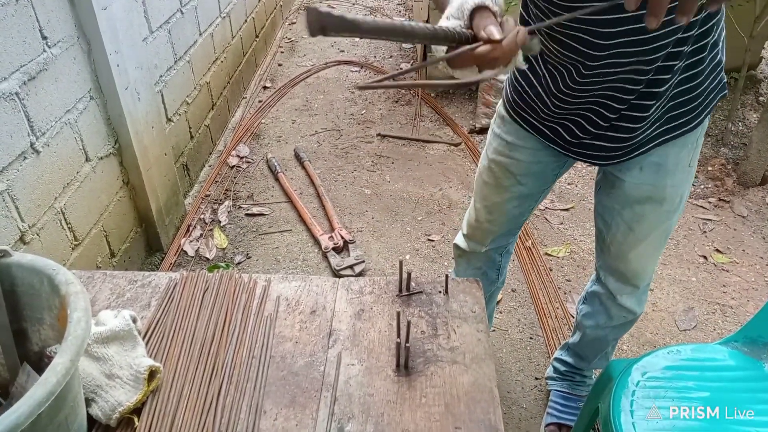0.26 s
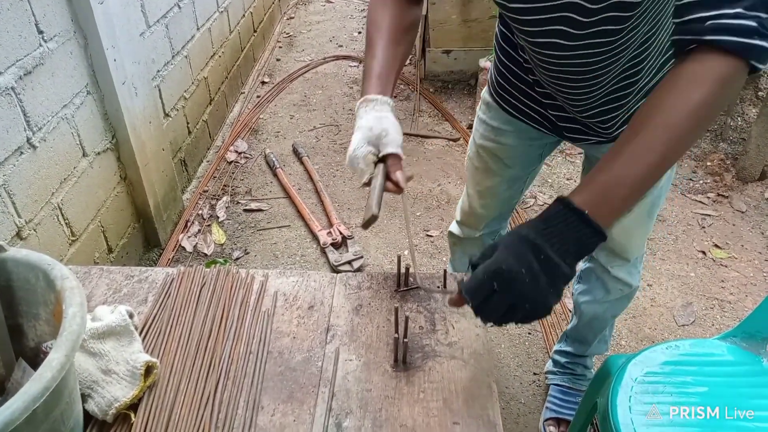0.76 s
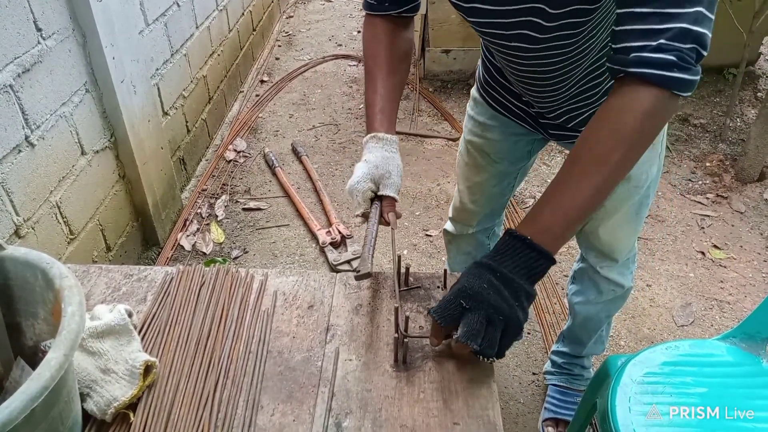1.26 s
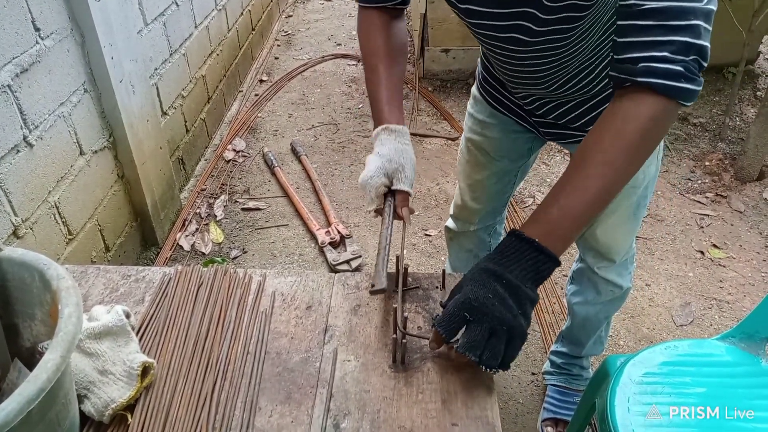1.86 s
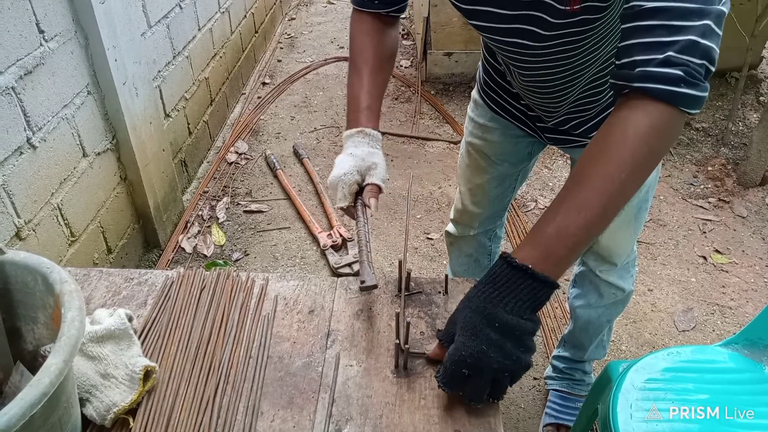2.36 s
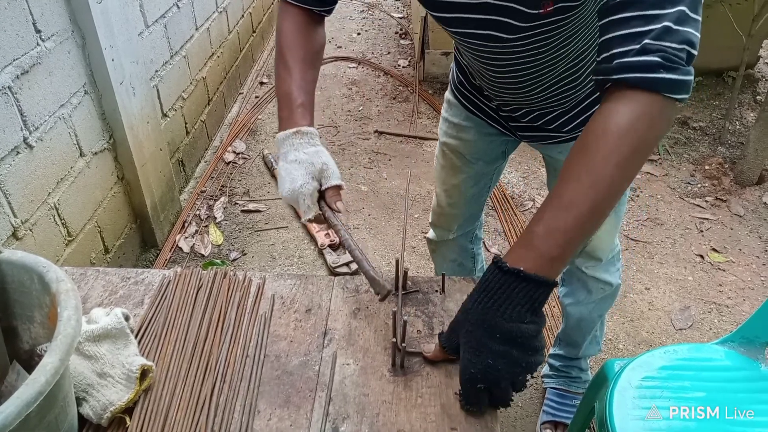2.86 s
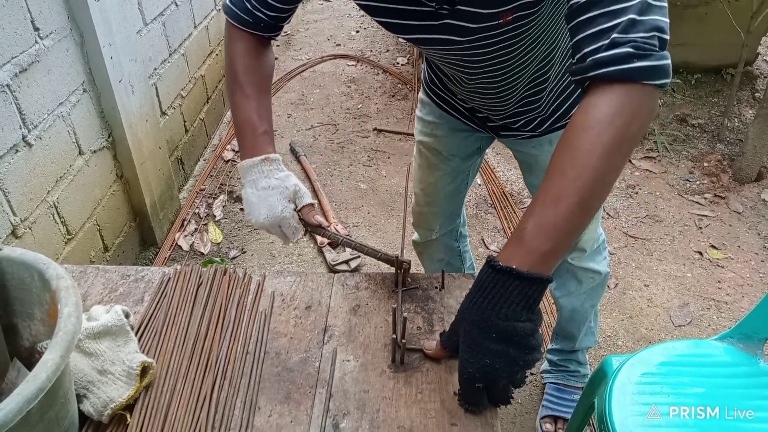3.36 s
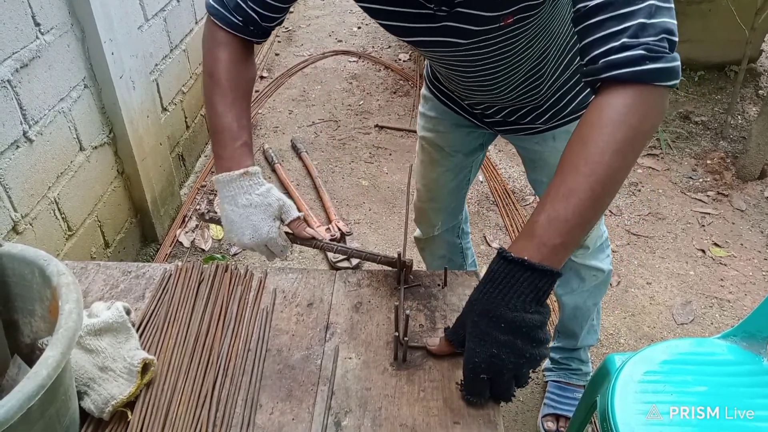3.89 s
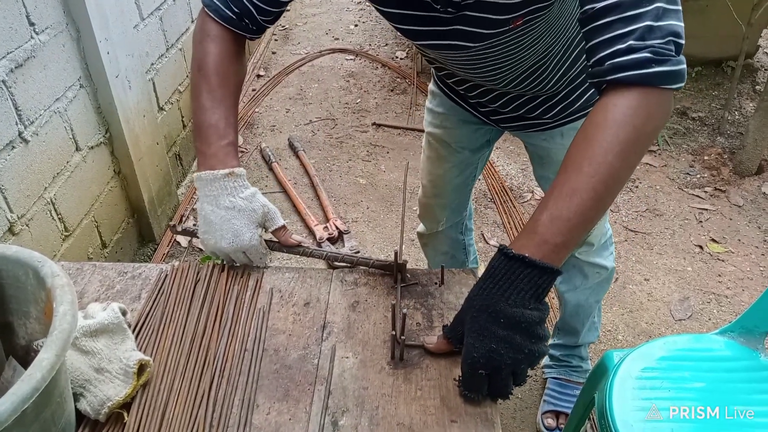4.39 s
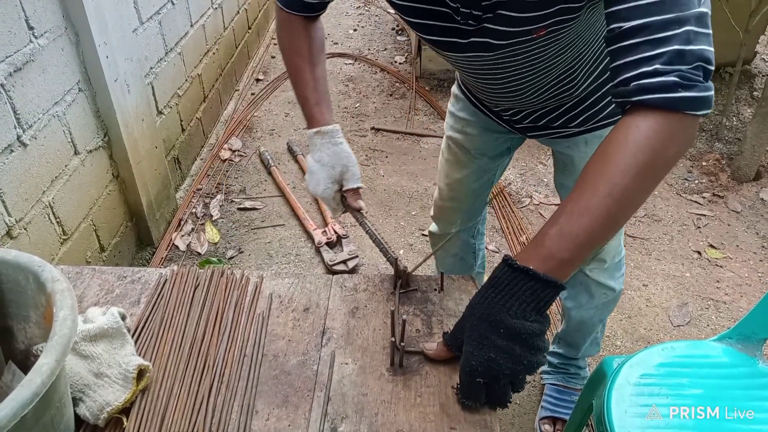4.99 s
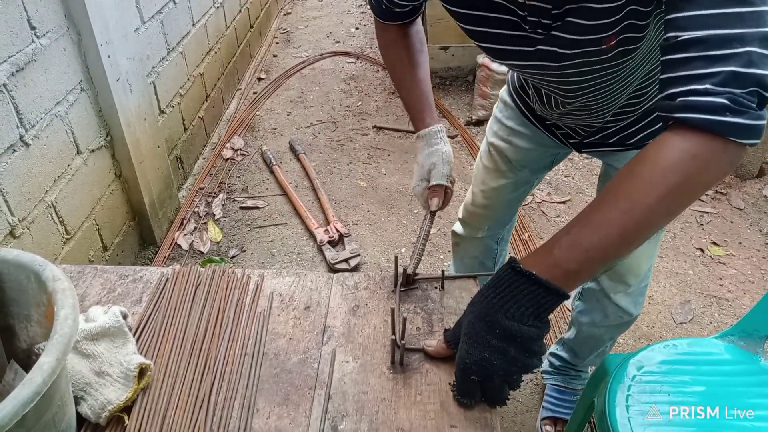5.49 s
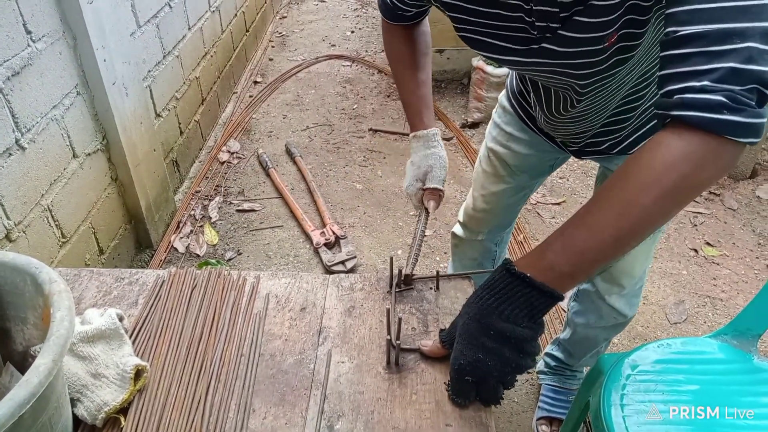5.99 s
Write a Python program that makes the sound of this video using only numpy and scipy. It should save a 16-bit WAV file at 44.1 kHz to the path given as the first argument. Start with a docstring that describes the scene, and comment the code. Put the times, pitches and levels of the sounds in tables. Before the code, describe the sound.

Sporadic bright metal clinks and dull wooden knocks from bending a bar by hand, over pulsing cicada hiss and a faint outdoor rumble.

```python
"""On an outdoor wooden workbench, a thin steel bar is laid between steel pins and bent with a hand lever.
Bar and lever clink, slide and rattle: noise bursts and fading tones make the steel, the jig and the bench.
Behind, a cicada hisses in swelling phrases of shaped noise with a thin whistle, and a bush cricket chirps
very high. Steady noise makes an insect chorus and a low rumble; a wavering tone makes a faint far hum."""
import sys
import numpy as np
from scipy import signal
from scipy.fft import rfft, irfft, next_fast_len
from scipy.io import wavfile
from scipy.ndimage import uniform_filter1d, minimum_filter1d, map_coordinates

SR = 44100
rng = np.random.default_rng(int(sys.argv[2]) if len(sys.argv) > 2 else 0)


def to_wav(s):
    """Save 16-bit WAV."""
    ch = np.atleast_2d(s).T  # columns
    pcm = np.round(np.clip(ch, -1, 1) * 32767)  # PCM
    wavfile.write(sys.argv[1], SR, pcm.astype(np.int16))


N = 275184
TIME = np.arange(N) / SR

# Tone colours of crowded short resonances: the bright clink of the steel and the middle clack of the jig. Each
# row: frequency in Hz, relative level per Hz in dB.
CLINK_COLOUR = [(1500, -53), (2000, -5.5), (2600, 1), (3400, 7.5), (4200, -2), (4900, -22), (7200, -39),
                (8200, -62.5), (15500, -58)]
CLACK_COLOUR = [(480, -76), (620, -21), (740, 7.5), (950, 1), (1200, -4), (1350, -3), (1530, -7), (1750, 9),
                (2200, -1), (3000, -10), (5000, -59.5)]
# The bite of a hard blow. Each row: frequency in Hz, relative level per Hz in dB.
BITE_COLOUR = [(3500, -18.5), (4400, -7), (5200, 13), (6000, -1), (7200, 0), (8200, -4.5), (12000, -4.5),
               (15500, -30.5)]
# Ringing tones (modes) of the jig and its steel pins, and of the bench top.
# Each row: frequency in Hz, relative level in dB, time to fade by 60 dB in seconds.
JIG_MODES = [(711, -1, 0.091), (787.3, -2, 0.12), (855, 6.5, 0.038), (971, 0.5, 0.063), (1042, -3, 0.033),
             (1138, -6.5, 0.11), (1340, 2, 0.061), (1473, -12, 0.15), (1565, -6.5, 0.087), (1772, 2, 0.06),
             (1987, -6, 0.077), (2260, -4.5, 0.18)]
BENCH_MODES = [(148.4, -6.5, 0.068), (206, -11.5, 0.051), (276.4, -4.5, 0.07), (334.5, 2, 0.11),
               (415.4, -5, 0.086), (468.3, -6, 0.11)]


def amp(db):
    """Turn decibels into a gain."""
    return 10 ** (np.asarray(db) / 20)


def unit(x):
    """Scale a sound to an average (rms) level of 1."""
    return x / np.sqrt(np.mean(x ** 2) + 1e-20)


def wobble(rate):
    """Draw a smooth random curve through `rate` random points a second."""
    return map_coordinates(rng.standard_normal(N // 8), [TIME * rate], mode="mirror")


def filtered(x, response):
    """Multiply each frequency in x by the gain that response(Hz) gives."""
    size = next_fast_len(N + 8192)
    hz = np.fft.rfftfreq(size, 1 / SR)
    return irfft(rfft(x, size) * response(hz), size)[:N]


def coloured(x, spectrum):
    """Shape x by a table of (Hz, dB) points and scale it to rms 1."""
    point_hz, point_db = np.transpose(spectrum)
    # the curve runs straight between points on a logarithmic frequency scale
    return unit(filtered(x, lambda hz: amp(np.interp(np.log(hz + 1), np.log(point_hz), point_db))))


def noise(spectrum):
    """Make hiss shaped by a (Hz, dB) table, at rms 1."""
    return coloured(rng.standard_normal(N), spectrum)


def narrow(hz, width_hz):
    """Make a tone blurred by random wobbling, like a noisily driven resonance following a pitch curve."""
    phase = 2 * np.pi * np.cumsum(hz * np.ones(N)) / SR
    return unit(wobble(width_hz) * np.cos(phase) + wobble(width_hz) * np.sin(phase))


def gesture(start, length, attack, release, swell_db=0):
    """Rise over attack, hold while swelling by swell_db a second, then fall 20 dB per release time."""
    t = TIME - start
    held_db = swell_db * (np.clip(t, 0, length) - length / 2)
    fall_db = 20 * np.maximum(t - length, 0) / release
    return np.clip(t / attack, 0, 1) * amp(held_db - fall_db)


def add(track, s, sound):
    """Mix a sound into the track at s seconds."""
    part = track[round(s * SR):][:len(sound)]
    part += sound[:len(part)]


def fade(t, t60, attack):
    """Rise quickly, then die away by 60 dB every t60 seconds."""
    return amp(-60 * t / t60) * (1 - np.exp(-t / attack))


def struck(modes, t, scatter_db, detune):
    """Ring a set of fading tones; the grip shifts their strengths and pitches at every blow."""
    hz, db, t60 = np.transpose(modes)[:, :, None]
    gain = amp(db + scatter_db * rng.standard_normal(hz.shape))
    hz = hz * (1 + detune * rng.standard_normal(hz.shape))
    waves = np.sin(2 * np.pi * (hz * t + rng.random(hz.shape))) * amp(-60 * t / t60)
    # scaled so that the set starts at rms 1, apart from its soft onset
    ringing = (gain * waves).sum(0) / np.sqrt(np.sum(gain ** 2) / 2)
    onset = (1 - np.exp(-t / 0.00036)) ** 2
    return ringing * onset


def yard(x, t60):
    """Add up scattered echoes from the wall and the ground, modelled as a burst of fading noise."""
    t = np.arange(SR // 2) / SR
    tail = rng.standard_normal(len(t)) * fade(t, t60, attack=0.0054)
    return signal.fftconvolve(x, tail / np.linalg.norm(tail))[:N]


def cicada():
    """Rasping phrases with a thin, grainy whistle that flares early, sags, and drops away as each runs out."""
    # Cicada phrases. Each row: start in seconds, length in seconds, low rasp level in relative dB,
    # high rasp level in relative dB, swell in dB per second, whistle length in seconds,
    # whistle starting pitch in Hz, whistle level in relative dB.
    phrases = [(-.1, 0.25, -45.5, -40, -5, 0.34, 5660, -61),
               (0.333, 0.73, -50, -43.5, 7, 0.65, 5690, -54.5),
               (1.215, 0.48, -50, -40.5, 6.5, .52, 5660, -55),
               (1.87, 0.56, -45, -45.5, -2, 0.3, 5577, -57.5),
               (2.738, 0.47, -51.5, -48, 15, 0.244, 5879, -61.5),
               (3.502, 0.4, -44, -47, 5, 0.47, 5940, -67),
               (4.398, 0.44, -41, -41.5, -8.5, 0.52, 5953, -54.5),
               (5.153, 0.52, -40.5, -44.5, -5.5, 0.33, 5884, -53.5),
               (5.991, 0.49, -41.5, -46, 3, 0.34, 5765, -55)]
    # The two body resonances. Each row: frequency in Hz, relative level per Hz in dB.
    low_rasp = [(1000, -43.5), (1600, -12.5), (1950, 5.5), (2250, 16), (2600, 9), (3100, 15), (3450, 10.5),
                (4400, -46.5)]
    high_rasp = [(2200, -28), (2750, -20.5), (3100, -5), (3700, 2), (4050, -2), (4350, -10.5), (4800, -15),
                 (5150, -25.5), (6500, -32), (8500, -58)]
    phrase_attack_s, phrase_release_s = 0.043, 0.12
    whistle_attack_s, whistle_release_s = .09, 0.065
    whistle_sag_hz, whistle_drop_hz_per_s = 190, 1100
    whistle_rest_db = -13  # how loud the whistle stays after its flare, against the phrase
    idle_low_db, idle_high_db = -63, -53.5  # between phrases the rasp idles

    low, high, tone, tone_hz = np.zeros((4, N))
    for s, length, low_db, high_db, swell_db, whistle_s, hz, whistle_db in phrases:
        effort = gesture(s, length, phrase_attack_s, phrase_release_s, swell_db)
        low = np.maximum(low, amp(low_db) * effort)
        high = np.maximum(high, amp(high_db) * effort)
        flare = gesture(s, whistle_s, whistle_attack_s, whistle_release_s, 2 * swell_db)
        tone += amp(whistle_db) * np.maximum(flare, amp(whistle_rest_db) * effort)
        # the pitch sags during the phrase and drops faster after it
        spent = np.minimum((TIME - s) / length, 1)
        overrun = np.clip(TIME - s - length, 0, phrase_release_s)
        pitch = hz - whistle_sag_hz * spent ** 2 - whistle_drop_hz_per_s * overrun
        tone_hz = np.where(TIME < s, tone_hz, pitch)
    rasp = amp(-1.0) * np.hypot(low, amp(idle_low_db)) * noise(low_rasp)
    rasp += amp(-2.3) * np.hypot(high, amp(idle_high_db)) * noise(high_rasp)
    rasp *= amp(.7 * wobble(16))
    grainy = narrow(tone_hz + 35 * wobble(14), width_hz=300) * amp(0.99 * wobble(110) + 1.9 * wobble(16))
    whistle = amp(-4.0) * tone * unit(grainy)
    # echoes off the wall comb the rasp into fixed narrow ridges
    return amp(-1.6) * (rasp + amp(-4.5) * yard(rasp, t60=0.051)) + whistle


def bush_cricket():
    """Very high chirps, each rising in pitch and swelling then fading over one wing stroke."""
    stroke = (15.1 * TIME + .1 * wobble(5)) % 1  # 0 to 1 through each stroke, about 15 a second
    hz = 11300 + 750 * np.minimum(stroke / .55, 1)
    # it grows louder, by 0.4 dB a second, as it warms up
    loudness = amp(-81.5 + 0.4 * TIME)
    return loudness * narrow(hz, width_hz=300) * np.sin(np.pi * stroke)


def outdoors():
    """Far insects and low rumble from shaped noise, and the wavering hum of a distant motor."""
    # Steady insect chorus and outdoor rumble. Each row: frequency in Hz, relative level per Hz in dB.
    chorus = [(4000, -29.5), (5300, -11.5), (6300, -12), (6850, -4), (7550, -6), (8000, -20), (8700, -32.5),
              (10700, -35), (11600, -22.5), (13000, -25), (13700, -17.5), (15400, -31)]
    rumble = [(20, -43), (45, -12), (65, -1.5), (80, 1), (105, -9.5), (140, 0.5), (200, -6.5), (280, -12),
              (430, -11), (750, -17.5), (1200, -31.5), (3000, -14), (8000, -59.5)]
    hum_hz = 65.5
    hum = np.sin(2 * np.pi * hum_hz * TIME + 0.83 * wobble(1.3)) * amp(-53.5 + 5.5 * wobble(9.5))
    insects = amp(-64.5) * noise(chorus) * amp(.6 * wobble(34))
    return insects + amp(-51.5) * noise(rumble) + hum


def landings(count):
    """Give each contact's time and three levels; a loose bar bounces, each flight shorter, each landing softer."""
    # Steel meeting pin or bench. Each row: time in seconds, clink level in relative dB,
    # clack level in relative dB, bench knock level in relative dB,
    # flight to the first bounce in seconds (0 = held fast).
    meetings = [(.268, -40, -61, -50, 0.021), (0.333, -37, -68, -57, 0.00038),
                (.971, -14, -25.5, -31, 0.018), (1.024, -25, -27.5, -41, 0), (1.087, -36, -45, -40, 0.0014),
                (1.128, -38, -33, -27, 0.0015), (1.165, -28.5, -37, -32.5, 0),
                (1.21, -26.5, -45.5, -46, 0.0036), (1.252, -39, -42.5, -42, 0.002),
                (1.419, -39, -39.5, -66, 0.0023), (1.675, -57, -45.5, -35, 0.002),
                (1.789, -43, -35, -22.5, 0.0027), (1.854, -27, -46, -62, 0),
                (2.059, -24, -16.5, -9, 0.0099), (2.412, -35, -22, -22, 0.0014),
                (2.513, -52, -43, -47, 0.0065), (2.689, -11, -16, -18, 0.011), (3.1139, -9.5, -20, -24, 0),
                (3.3, -10, -23, -28.5, 0.00046), (3.345, -15, -24, -30, 0.0019), (3.373, -20, -29, -38, 0),
                (3.395, -18.5, -32.5, -37, 0.00097), (3.452, -20.5, -20, -16.5, 0.0029),
                (3.462, -12.5, -18.5, -19.5, .01), (3.486, -18, -43, -32, 0.0024),
                (3.497, -14.5, -18.5, -21, 0.0055), (4.271, -21, -47, -47, 0.003),
                (4.287, -20, -23.5, -18, 0.0017), (4.293, -11.5, -23, -34, .006),
                (4.313, -14, -39, -36, 0.00039), (4.359, -26.5, -49, -52, 0.00053),
                (4.626, -18.5, -21.5, -15, 0), (5.112, -41.5, -33.5, -31, 0),
                (5.636, -51, -37, -34.5, 0.0022), (5.79, -37.5, -28.5, -23, 0.0049),
                (5.871, -57, -47.5, -35, 0.037)]
    bounce_shrink, steel_loss_db, bench_loss_db = .69, 6, 6
    for s, clink_db, clack_db, knock_db, flight in meetings:
        loose = flight > .003  # shorter flights make a single landing
        for k in range(count if loose else 1):
            steel_lost, bench_lost = k * steel_loss_db, k * bench_loss_db
            yield s, clink_db - steel_lost, clack_db - steel_lost, knock_db - bench_lost
            s += flight * bounce_shrink ** k


def contacts():
    """Each contact cracks, rings the steel and the jig, and thumps the bench."""
    # Bending modes of bar and lever, and the lever's highest modes, woken only by hard blows.
    # Each row: frequency in Hz, relative level in dB, time to fade by 60 dB in seconds.
    steel_modes = [(2256, -8, .08), (2485, -7.5, .08), (2635, -7, .09), (2863, -3, .1), (2985, -4, .11),
                   (3222, -1, .1), (3424, -3, .11), (3518, -2, .1), (3829, -6, .09), (4015, -8, .09),
                   (4330, -13, .08), (4745, -22, .11)]
    ping_modes = [(7020, 6, 0.065), (8900, -9, 0.12), (11400, -8, 0.13), (14360, -12, .1)]
    # Tone colour of the low, dull bench knock. Each row: frequency in Hz, relative level per Hz in dB.
    knock_colour = [(50, -51.5), (110, -13.5), (200, -8), (340, -1), (480, -1), (590, -12.5), (900, -24.5),
                    (2000, -88)]
    contact_t60_s = 0.094

    out, t = np.zeros(N), np.arange(SR // 3) / SR
    colours = (BITE_COLOUR, CLINK_COLOUR, CLACK_COLOUR, knock_colour)
    bite, clink, clack, knock = (np.pad(noise(colour), (0, len(t))) for colour in colours)
    # the plank gives way and springs back once
    u = t / 0.0011 - np.pi
    push = (1 - 2 * u ** 2) * np.exp(-u ** 2)
    for s, clink_db, clack_db, knock_db in landings(count=4):
        now = slice(round(s * SR), round(s * SR) + len(t))
        crack = amp(-4) * fade(t, 0.041, attack=0.0009)
        steel = clink[now] * (amp(-8.5) * fade(t, contact_t60_s, attack=0.00017) + crack)
        # the grip changes each steel mode a lot from blow to blow
        steel += amp(-3.0) * struck(steel_modes, t, scatter_db=6, detune=0.0053)
        # a harder blow is briefer, so its treble grows faster than its level
        treble = bite[now] * fade(t, 0.077, attack=.0005)
        treble += amp(-5) * struck(ping_modes, t, scatter_db=3.5, detune=0.0026)
        steel += amp(-9.0 + 1.78 * clink_db) * treble
        jig = clack[now] * amp(-5) * fade(t, contact_t60_s, attack=0.0024)
        jig += amp(-1.5) * struck(JIG_MODES, t, scatter_db=1.0, detune=0.0058)
        wood = knock[now] * amp(-10) * fade(t, 0.12, attack=.001) + amp(-4.5) * push
        wood += amp(-4.0) * struck(BENCH_MODES, t, scatter_db=6.0, detune=0.027)
        add(out, s, amp(clink_db) * steel + amp(clack_db) * jig + amp(knock_db) * wood)
    return out


def rings():
    """Short notes of bar and bench: high ones from the steel, low ones from the bench top."""
    # Each row: start in seconds, pitch in Hz, level in dB, time to fade by 60 dB in seconds.
    notes = [(.985, 836, -26, 0.26), (1.164, 474, -21.5, 0.063), (1.21, 3334, -14.5, 0.034),
             (1.742, 885, -29.5, 0.15), (2.062, 213, -9, 0.042), (2.063, 416, -5.5, 0.062),
             (2.412, 330.8, -16, 0.094), (2.691, 2987, -9, 0.12), (3.114, 734.4, -17.5, 0.14),
             (3.115, 2634, -6, 0.056), (3.113, 4298, -5, 0.022), (3.301, 809, -25, 0.31),
             (3.301, 2120, -15, 0.11), (3.395, 2025, -19, 0.1), (3.469, 1773, -21, .19),
             (3.497, 943.3, -17.5, 0.11), (3.505, 1393, -30.5, 0.2), (3.51, 291, -24.5, 0.25),
             (4.293, 3500, -10, .11), (4.627, 195.4, -21.5, .1), (4.629, 291, -19.5, 0.1),
             (5.794, 266, -25.5, .1), (5.796, 703, -26.5, 0.12)]
    out, t = np.zeros(N), np.arange(SR // 2) / SR
    for s, hz, db, t60 in notes:
        main = np.sin(2 * np.pi * hz * t)
        # each note has a weaker twin, 48 Hz higher, that beats with it
        twin = amp(-13.0) * np.sin(2 * np.pi * ((hz + 48) * t + rng.random()))
        add(out, s, amp(db) * fade(t, t60, attack=0.0011) * (main + twin))
    return out


def scrape():
    """Rust catches in dense tiny slips that shake the jig, and the sliding bar squeals."""
    # The bar dragged over pins and wood.
    # Each row: start in seconds, length in seconds, friction level in relative dB.
    drags = [(1.11, 0.049, -41), (1.377, 0.082, -51), (1.58, 0.041, -52), (1.849, 0.2, -41),
             (2.033, 0.035, -33.5), (2.136, 0.048, -44), (2.325, 0.056, -37), (2.786, 0.09, -44.5),
             (3.468, 0.069, -36), (4.227, .05, -40.5), (4.286, 0.036, -30.5)]
    # The bar squeals as it is pushed through the pins.
    # Each row: start in seconds, length in seconds, starting pitch in Hz, level in relative dB.
    slides = [(1.052, 0.04013, 3660, -43.5), (1.122, .05, 3650, -34), (1.856, 0.074, 3733, -37),
              (1.948, 0.16, 2910, -41.5), (4.229, .04, 3890, -48)]
    # The sliding bar's close modes. Each row: pitch as a ratio to the main one, relative level in dB.
    slide_modes = [(0.488, -10), (.71, -11), (0.83, 1.5), (1, 7.5), (1.17, -4)]
    drag_attack_s, drag_release_s, drag_swell_db_per_s = 0.022, 0.059, 3
    slide_attack_s, slide_release_s, slide_sag_hz_per_s = .008, 0.02, 1900
    slips_per_s, slip_uneven_db = 5000, 2.2  # how often and how unevenly the rust catches

    drag = np.zeros(N)
    for s, length, db in drags:
        drag += amp(db) * gesture(s, length, drag_attack_s, drag_release_s, drag_swell_db_per_s)
    caught = rng.random(N) < slips_per_s / SR
    slips = rng.standard_normal(N) * caught * amp(slip_uneven_db * wobble(90))
    body = struck(JIG_MODES + BENCH_MODES, np.arange(SR // 4) / SR, scatter_db=3.0, detune=0.003)
    rub = amp(-9.5) * coloured(slips, CLACK_COLOUR) + amp(-4.5) * coloured(slips, CLINK_COLOUR)
    rub += amp(-0.5) * unit(signal.fftconvolve(slips, body)[:N])
    rub += amp(-31) * coloured(slips, BITE_COLOUR)
    # the rubbed length grows as the bar is pushed through, so the squeal sinks
    slide, slide_hz = np.zeros(N), np.zeros(N)
    for s, length, hz, db in slides:
        slide += amp(db) * gesture(s, length, slide_attack_s, slide_release_s)
        sinking_hz = hz - slide_sag_hz_per_s * np.minimum(TIME - s, length)
        slide_hz = np.where(TIME < s, slide_hz, sinking_hz)
    # higher modes are damped more, so they are wider
    squeal = sum(amp(db) * narrow(slide_hz * ratio, width_hz=260 * ratio ** 3) for ratio, db in slide_modes)
    return drag * rub + amp(-6.5) * slide * squeal


def scene():
    """Mix the work at the bench, with its echoes, among the outdoor sounds."""
    # deep bass is cut from the work
    bass_cut = signal.butter(2, 85, "high", fs=SR, output="sos")
    work = signal.sosfilt(bass_cut, contacts() + rings() + scrape())
    return (work + amp(-16.5) * yard(work, t60=0.25) + cicada() + bush_cricket() + outdoors())[None]


def record(dry):
    """A limiter ducks the highest peaks, then everything above the band limit is removed."""
    ceiling, top_hz = .9, 15500
    needed = ceiling / np.maximum(np.abs(dry[0]), ceiling)
    # the gain dips around each peak and is smoothed over 161 samples
    gain = uniform_filter1d(minimum_filter1d(needed, size=161), size=161)
    return filtered(dry[0] * gain, lambda hz: hz < top_hz)[None]


dry = scene()
out = record(dry)
to_wav(out)
```